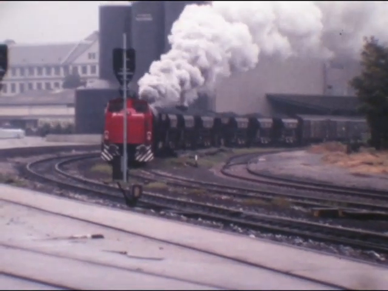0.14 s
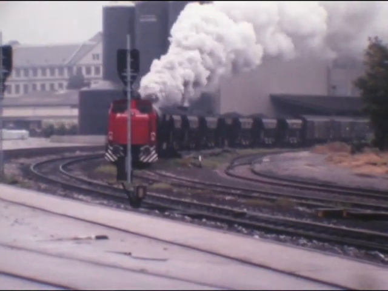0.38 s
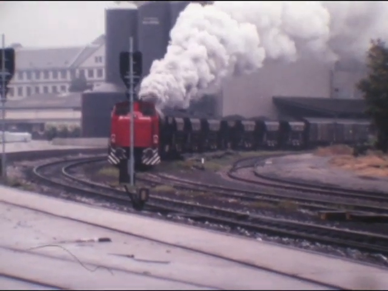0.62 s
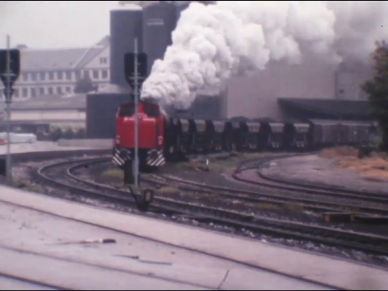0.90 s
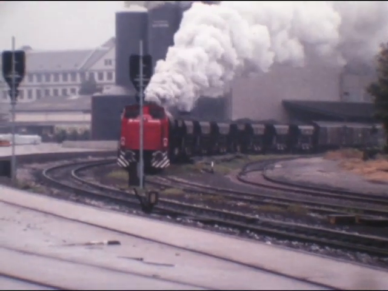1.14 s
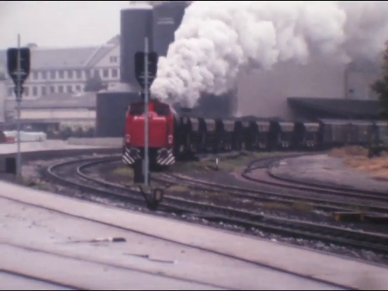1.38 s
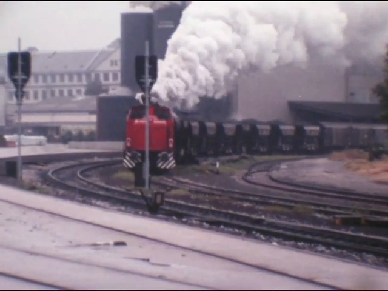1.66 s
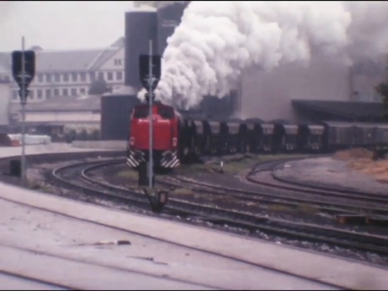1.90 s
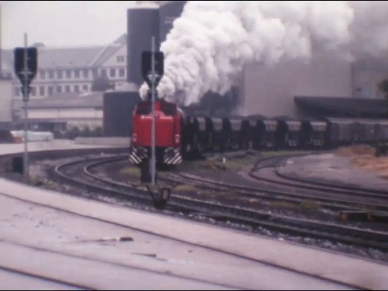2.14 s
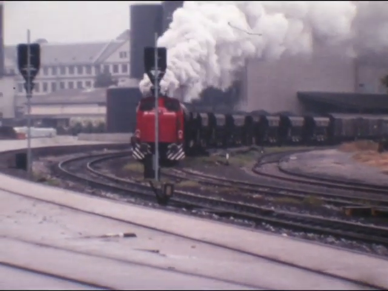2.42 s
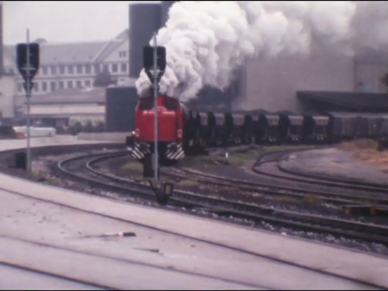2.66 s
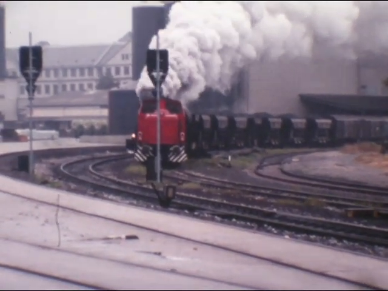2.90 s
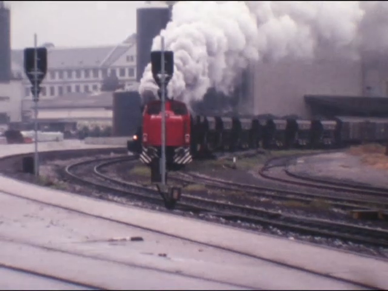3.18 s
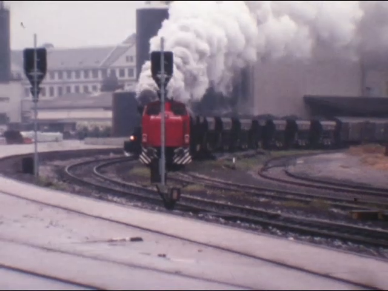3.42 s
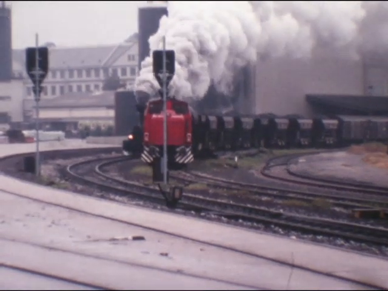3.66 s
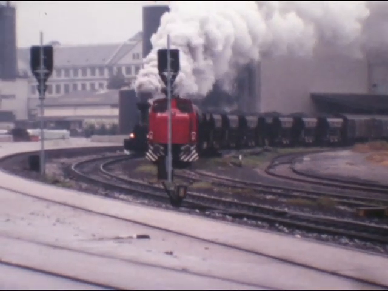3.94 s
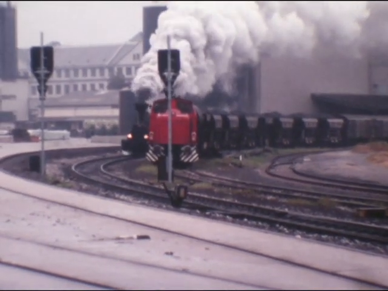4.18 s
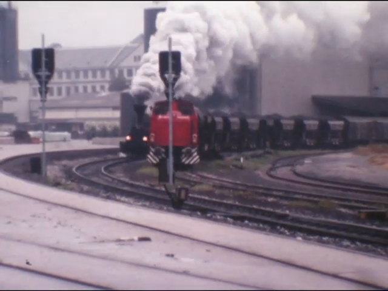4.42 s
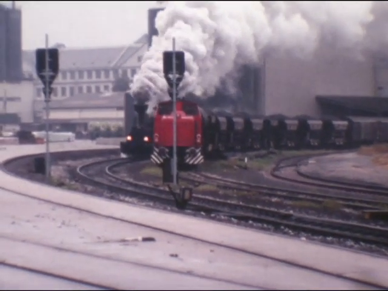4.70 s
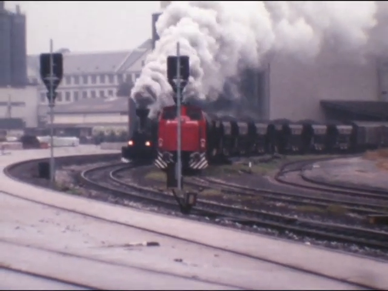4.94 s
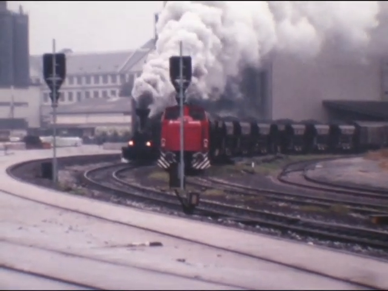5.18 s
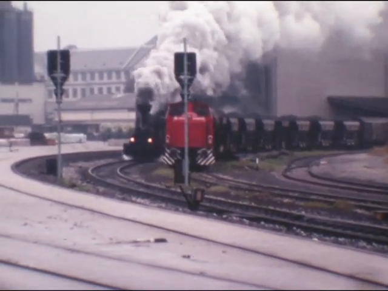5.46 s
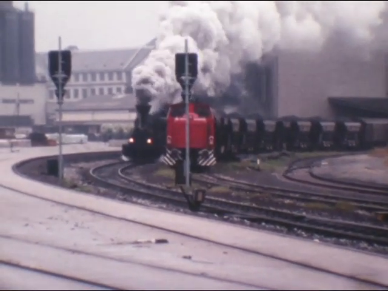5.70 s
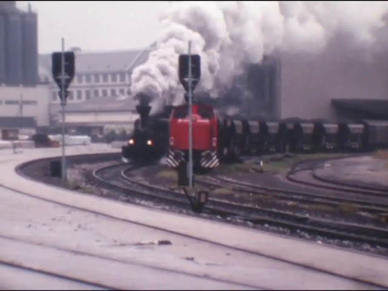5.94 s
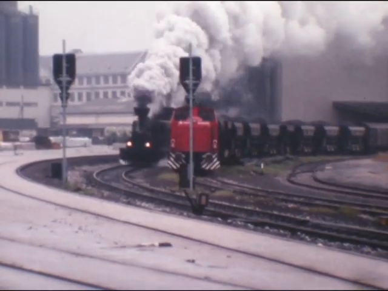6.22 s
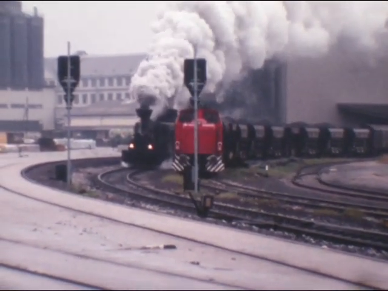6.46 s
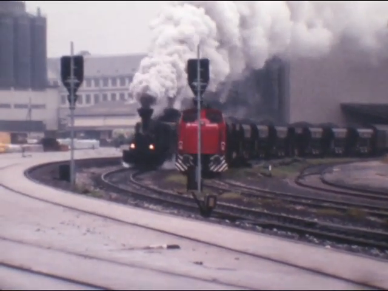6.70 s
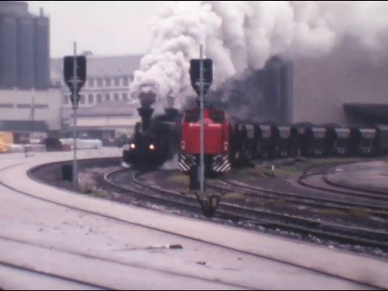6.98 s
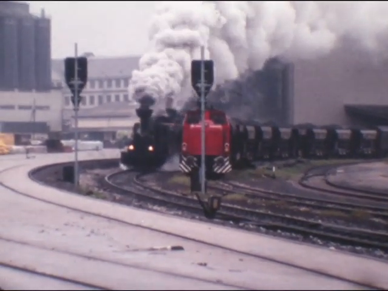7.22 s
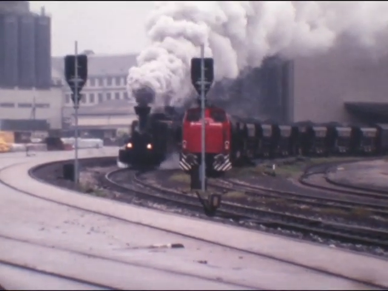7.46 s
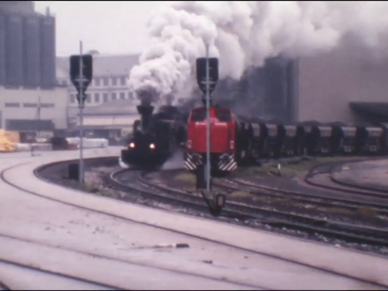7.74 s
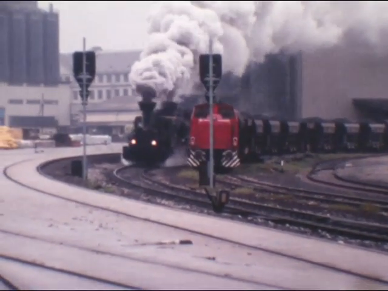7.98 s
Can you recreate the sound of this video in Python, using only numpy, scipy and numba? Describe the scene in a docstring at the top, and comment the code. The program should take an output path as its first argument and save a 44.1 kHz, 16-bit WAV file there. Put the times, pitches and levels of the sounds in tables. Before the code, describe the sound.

Heavy low engine pulsing surges and falters over gusty roar and wagon rumble, as faint steam puffs grow clearer on dull, worn tape.

```python
"""Railway yard on worn tape

A big diesel idles close by: its two banks fire in turn, each firing a pressure pulse that rings the stack modes.
The governor hunts, and about every two seconds a fuel cut starves one bank. A steam engine draws near: soft
chuffs of shaped noise over steady steam, a whistling leak, a drifting drone, a gusty roar and rumbling wagons.
Worn analogue tape squeezes and dulls the treble, loses head contact once and adds hiss and a tick."""
import sys
import numpy as np
from scipy import signal
from scipy.fft import rfft, irfft
from scipy.io import wavfile
from scipy.ndimage import uniform_filter1d
from numba import njit

SR = 44100
rng = np.random.default_rng(int(sys.argv[2]) if len(sys.argv) > 2 else 0)


def output_pcm(signal):
    """Save a mono or channel-first signal as 16-bit PCM at the path in sys.argv[1].

    Samples are clipped to [-1, 1] before scaling.
    """
    pcm = np.clip(np.atleast_2d(signal).T, -1, 1) * 32767
    wavfile.write(sys.argv[1], SR, np.round(pcm).astype(np.int16))


def convert_level_to_amplitude(level_db):
    """Map a level in decibels to its linear amplitude factor."""
    exponent = np.asarray(level_db, float) / 20
    return 10 ** exponent


N = 357210

# The steam engine nears: t/s, rumble level/dB, steady steam level/dB, leak level/dB
APPROACH = [(0, -17.5, -49, -70), (.8, -19, -50.5, -57), (1.2, -20, -51.5, -65), (2.3, -19, -54, -65),
            (3.1, -19, -53.5, -68.5), (3.3, -19.5, -49.5, -62.5), (3.7, -19, -51.5, -62),
            (4.3, -18.5, -48, -62), (4.9, -18.5, -45.5, -57), (5.5, -19, -47, -53),
            (6.2, -18.5, -47.5, -52.5), (7.2, -18, -46.5, -50), (8.1, -19, -43, -50.5)]


def unit(x):
    """Normalisation: divides a signal by its root mean square."""
    return x / np.sqrt(np.mean(x ** 2))


def curves(table):
    """Linear interpolation in time: one curve for each column after the first."""
    time_s, *columns = np.transpose(table)
    return [np.interp(np.arange(N) / SR, time_s, column) for column in columns]


def walk(rate):
    """Smoothed random process: levels held 1 / rate s, averaged twice over that time; spread near 1."""
    hold = int(SR / rate)
    held = np.repeat(rng.standard_normal(N // hold + 1), hold)
    return 1.3 * uniform_filter1d(uniform_filter1d(held, hold), hold)[:N]


def noise(gain):
    """Spectral shaping: white noise multiplied by a gain that depends on frequency."""
    hz = np.arange(N // 2 + 1) * SR / N + 1  # the 1 Hz offset keeps log(hz) finite
    return irfft(rfft(rng.standard_normal(N)) * gain(hz), N)


def peak(hz, centre_hz, width_hz):
    """Resonance curve: 1 at the centre, one half at half a width to either side."""
    return 1 / (1 + ((hz - centre_hz) / (width_hz / 2)) ** 2)


def colour(hz, spectrum):
    """Spectral density: gain joined by straight lines in dB over log frequency."""
    point_hz, level_db = np.transpose(spectrum)
    return convert_level_to_amplitude(np.interp(np.log(hz), np.log(point_hz), level_db, left=-120, right=-120))


def bands(gain, flicker_db, rate, throb, depth, octaves=range(9)):
    """Amplitude modulation by octave: each band flickers alone, the upper ones throb with the diesel."""
    total = 0
    for k in octaves:
        def band_gain(hz):
            return gain(hz) * np.cos(np.pi / 2 * np.clip(np.log2(hz / 32) - k, -1, 1))
        flicker = convert_level_to_amplitude(flicker_db * walk(rate))
        total = total + noise(band_gain) * flicker * (1 + depth * (k > 1) * throb)
    return unit(total)


@njit
def lowpass(x, edge_hz):
    """Two-pole state-variable low-pass whose edge may move at every sample."""
    y, band, low = np.empty(len(x)), 0., x[0]
    for i in range(len(x)):
        g = np.tan(np.pi * edge_hz[i] / SR)
        v = (band + g * (x[i] - low)) / (1 + g * (g + np.sqrt(2)))
        y[i] = low + g * v
        band, low = 2 * v - band, 2 * y[i] - low
    return y


def strike(at_s, size, shape):
    """Convolution: superposes one scaled copy of a shape at each moment."""
    lead = SR // 5  # room for moments before the start
    kicks = np.zeros(N + 2 * lead)
    np.add.at(kicks, (at_s * SR).astype(int) + lead, size)
    return signal.fftconvolve(kicks, shape)[lead:lead + N]


def hum():
    """Periodic radiation: steady sinusoids from machinery beside the diesel."""
    # f/Hz, rms level/dB
    tones = [(104.75, -28), (38.1, -37)]
    t = np.arange(N) / SR
    return sum(np.sqrt(2) * convert_level_to_amplitude(db) * np.sin(2 * np.pi * (hz * t + rng.random())) for hz, db in tones)


def body(hz):
    """Forced resonance: engine casings lift parts of a falling broadband spectrum."""
    # Broadband spectrum: f/Hz, relative level per Hz/dB
    spectrum = [(20, -27.5), (32, -8.5), (55, -12), (76, -7.5), (95, -14), (120, -4), (145, -9),
                (168, -16.5), (200, -14), (250, -22), (400, -23.5), (540, -30.5), (940, -35), (1580, -40),
                (1850, -46), (3000, -55), (3900, -69.5)]
    # Casing resonances: f/Hz, width/Hz, lift/dB
    casings = [(287, 24, 4), (331, 41, 3.5), (422, 24, 2.5), (671, 120, 5.5), (831, 40, 5), (1075, 95, 2),
               (1580, 92, 2.5)]
    return colour(hz, spectrum) * convert_level_to_amplitude(sum(db * peak(hz, f, w) for f, w, db in casings))


def wagon_rumble(throb):
    """Rolling noise: the three lowest octaves of the body spectrum, following the approach."""
    rumble = bands(body, flicker_db=0.75, rate=10.0, throb=throb, depth=0.03, octaves=range(3))
    return rumble * convert_level_to_amplitude(curves(APPROACH)[0])


def exhaust_roar(throb):
    """Broadband flow noise: the upper octaves of the body spectrum, their level wandering in gusts."""
    # t/s, level/dB
    roar_level = [(0, -22.5), (.8, -23.4), (1.2, -24.2), (2.3, -24.5), (3.1, -25), (3.8, -25), (4.2, -22.5),
                  (4.6, -24), (5, -23), (5.7, -24), (6.1, -23.5), (6.5, -24.5), (6.9, -23), (7.4, -23.5),
                  (8.1, -23.6)]
    gust_db, gusts_per_s = 0.68, 30
    roar = bands(body, flicker_db=0.5, rate=25.0, throb=throb, depth=0.047, octaves=range(3, 9))
    return roar * convert_level_to_amplitude(curves(roar_level)[0] + gust_db * walk(gusts_per_s))


def steam_leak():
    """Narrow-band jet noise: a leak whistles in two resonant bands."""
    # f/Hz, width/Hz, relative level/dB
    whistles = [(2890, 540, -0.5), (4880, 320, -8)]
    leak = unit(noise(lambda hz: sum(convert_level_to_amplitude(db) * peak(hz, f, w) for f, w, db in whistles)))
    return leak * convert_level_to_amplitude(curves(APPROACH)[2] + 1.3 * walk(12))


def drifting_drone():
    """Frequency modulation: the phase is the running sum of a drifting, wobbling frequency."""
    # t/s, f/Hz, rms level/dB
    drift = [(0, 330, -48), (3.3, 325, -42), (3.9, 328, -38), (4.2, 334, -30.5), (4.45, 340, -35),
             (4.9, 355, -39.5), (5.5, 352, -39.5), (5.9, 348, -34), (6.5, 343, -32.5), (6.9, 338, -38),
             (7.4, 338, -35.5), (8.1, 336, -40.5)]
    wobble_hz, wobbles_per_s = 4, 12
    waver_db, wavers_per_s = 1.5, 7.4
    drone_hz, drone_db = curves(drift)
    phase = 2 * np.pi * np.cumsum(drone_hz + wobble_hz * walk(wobbles_per_s)) / SR
    return np.sqrt(2) * np.sin(phase) * convert_level_to_amplitude(drone_db + waver_db * walk(wavers_per_s))


def steady_steam(throb):
    """Turbulent jet noise: a continuous hiss that grows and ebbs as the steam engine nears."""
    # f/Hz, relative level per Hz/dB
    spectrum = [(880, -33), (1500, -4.5), (1610, -12), (2070, -4.5), (2850, -3.5), (3990, -10), (4940, -14),
                (7070, -26.5), (7790, -35), (10100, -36.5), (16000, -55)]
    steam = bands(lambda hz: colour(hz, spectrum), flicker_db=.6, rate=20, throb=throb, depth=.03)
    return convert_level_to_amplitude(curves(APPROACH)[1]) * steam


def chuffs(throb):
    """Pulsed jet noise: puffs up the blast pipe excite the chimney resonance; distant air absorbs treble."""
    # Puffs: t/s, level/dB, spread/ms, chimney ring level above the puff/dB
    puffs = [(0.181, -56, 69, -2), (.82, -52, 66, 2), (1.5, -62.5, 60, -3.5), (1.9, -62.5, 55, -5),
             (2.55, -55, 45, -8), (2.771, -58, 48, -2.5), (3.225, -54, 30, -10), (3.551, -64, 34, -7),
             (3.87, -50, 75, -7), (4.259, -53, 55, -7), (4.53, -45.5, 80, 0), (4.85, -57, 47, -6),
             (5.152, -47, 76, 3), (5.54, -53.5, 38, -6), (5.81, -48, 83, 0), (6.152, -53, 60, -5),
             (6.479, -50, 80, -3), (6.801, -53, 50, -6), (7.1, -48, 86, -4), (7.42, -52.5, 42, -6),
             (7.72, -49, 74, 1), (8.07, -55, 38, -5)]
    # Puff spectrum: f/Hz, relative level per Hz/dB
    spectrum = [(1200, -36), (2000, -9), (3400, -7), (5000, -6), (6500, -13.5), (7800, -22), (9500, -25),
                (12000, -30), (16000, -42)]
    # Chimney resonance: f/Hz, width/Hz
    chimney = (3470, 600)
    # Air absorption, strongest while the engine is far: t/s, low-pass edge f/Hz
    air = [(0, 3700), (3, 4800), (3.8, 14050), (8.1, 13870)]
    ring_spread = 0.85  # the ring fills only the heart of a puff
    t = np.arange(N) / SR

    def bump(at_s, spread_ms):
        return np.exp(-.5 * ((t - at_s) * 1000 / spread_ms) ** 2)

    swell = sum(convert_level_to_amplitude(db) * bump(s, spread) for s, db, spread, _ in puffs)
    heart = sum(convert_level_to_amplitude(db + ring_db) * bump(s, ring_spread * spread) for s, db, spread, ring_db in puffs)
    jet = bands(lambda hz: colour(hz, spectrum), flicker_db=2.1, rate=16, throb=throb, depth=0)
    ring = unit(noise(lambda hz: peak(hz, *chimney)))
    return lowpass(swell * jet + heart * ring, curves(air)[0])


def governor(due, bank):
    """Limit cycle: firing lateness and force repeat from surge to surge, and fuel cuts starve one bank."""
    # One swing: share of the swing, lateness/ms, strength (0-1) of thump, low bark, high bark
    hunt = [(0, 3.5, 0.9, 0.96, 0.49), (.08, 3.8, .61, .76, .74), (.16, 1.5, .45, .6, 0.93),
            (.25, -2, .72, .64, .86), (.35, -3.0, .9, .5, .54), (.45, -2.5, .95, .85, .5),
            (.53, -2, 1.03, 0.96, .58), (.62, 0, 1, .86, .66), (.7, 0.33, .7, .62, .66),
            (.78, 1.5, .54, .36, 0.31), (.87, 2.8, .75, .42, .45), (.94, 3.5, .9, .86, .34)]
    # Starts of the swings: t/s, bark level/dB
    surges = [(-1.26, -1.5), (.5, 0.0), (2.3, 0.0), (4, 0.6), (6.0, 0.5), (8, 0.0), (9, 0.5)]
    # Fuel cuts: t/s, length/s, starved bank (0 or 1)
    cuts = [(0.781, .92, 0), (2.677, 0.97, 1), (4.553, .8, 1), (6.269, .93, 0)]
    # Share of thump, low bark and high bark left in a cut; below 0 the bank sucks gas back
    starved = [-0.19, -.02, .02]
    # Level/dB of thump, low bark and high bark at strength 1
    voice_db = [-4, -4.5, -6]
    cut_edge_s = .04
    suck_depth, suck_before_s, suck_spread_s = 0.42, .15, 0.13  # deeper suck just before the fuel returns

    surge_s, bark_db = np.transpose(surges)
    swing = np.interp(due, surge_s, np.arange(len(surges)))
    bark = convert_level_to_amplitude(np.interp(due, surge_s, bark_db))
    share, *columns = np.transpose(hunt)
    late_ms, *strength = [np.interp(swing, share, column, period=1) for column in columns]

    def onset(s):
        return 1 / (1 + np.exp(-s / cut_edge_s))

    cut, suck = 0, 0
    for start, length, starved_bank in cuts:
        hit = bank == round(starved_bank)
        end = start + length
        cut = cut + hit * onset(due - start) * onset(end - due)
        suck = suck + hit * np.exp(-.5 * ((end - suck_before_s - due) / suck_spread_s) ** 2)
    thump, low, high = [convert_level_to_amplitude(db) * c * (1 - cut * (1 - left))
                        for c, left, db in zip(strength, starved, voice_db)]
    return late_ms, [thump - suck_depth * convert_level_to_amplitude(voice_db[0]) * suck, bark * low, bark * high]


def diesel():
    """Impulse excitation: firings swell the silencer (thump) and ring the stack (bark); also returns the gas throb."""
    # Stack modes: f/Hz, level/dB, t60/s, delay of opening/ms, bark (1 low, 2 high)
    modes = [(105.87, -5, .35, 5.8, 1), (121.32, 1.26, .38, 8.06, 1), (161.97, -3, .5, 3.93, 2),
             (171.8, -3.0, .5, 4.05, 2)]
    # Exhaust port of low and high bark, which opens, then stifles the ring: rise/ms, stifled after/ms
    ports = [(12.2, 150), (7.7, 68)]
    # Silencer thump: f/Hz, level/dB
    thump_tones = [(56, -2.5), (40, -11)]
    firings_per_s, first_s = 17.994, -.0756
    thump_peak_ms, thump_spread_ms = 36.6, 13.4

    slot = np.arange(147)
    due = first_s + slot / firings_per_s
    late_ms, force = governor(due, slot % 2)  # the banks alternate
    chance = rng.standard_normal((2 + len(modes), len(slot)))
    at = due + (late_ms + .3 * chance[0]) / 1000
    t = np.arange(SR // 4) / SR

    u = t - thump_peak_ms / 1000
    swell = np.exp(-.5 * (u * 1000 / thump_spread_ms) ** 2)
    thump = -swell * sum(convert_level_to_amplitude(db) * np.cos(2 * np.pi * hz * u) for hz, db in thump_tones)
    out = strike(at, force[0] + .03 * chance[1], thump)

    # every firing shares its force a little differently among the modes
    for (hz, db, t60, opens_ms, group), own in zip(modes, chance[2:]):
        rise_ms, shut_ms = ports[group - 1]
        port = (1 - np.exp(-(t * 1000 / rise_ms) ** 3)) * np.exp(-(t * 1000 / shut_ms) ** 2)
        ring = -np.sin(2 * np.pi * hz * t) * port * 1000 ** (-t / t60)
        out = out + strike(at + opens_ms / 1000, convert_level_to_amplitude(db) * (force[group] + .035 * own), ring)

    soft_ends = (1 - np.exp(-(t / .003) ** 3)) * np.cos(np.pi / 2 * t / t[-1]) ** 2
    throb = strike(at + 0.019, np.abs(force[1]) + np.abs(force[2]), soft_ends * np.exp(-t / 0.041))
    return out, unit(throb - throb.mean())


def scene():
    """Interference: the sources add at one microphone, and the ground bounce cancels part of a band."""
    # f/Hz, width/Hz, share cancelled at the centre
    ground_dip = (139, 16, .65)
    engine, throb = diesel()
    train = wagon_rumble(throb) + exhaust_roar(throb) + steam_leak() + drifting_drone()
    direct = hum() + train + steady_steam(throb) + chuffs(throb) + engine
    centre_hz, width_hz, share = ground_dip
    hz = np.arange(N // 2 + 1) * SR / N
    return irfft(rfft(direct) * (1 - share * peak(hz, centre_hz, width_hz)), N)[None]


def tape_squeeze(x):
    """Intermodulation: steep bass swings, falling ones most, reduce the treble gain."""
    bass = lowpass(x, np.full(N, 400.))
    fall = -np.gradient(lowpass(x, np.full(N, 130.))) * SR  # slope per second
    swing = np.maximum(fall / 265, -fall / 450)
    return bass + (x - bass) / (1 + swing ** 4)


def tape_dropout(x):
    """Spacing loss: the head loses contact once, and the low-pass edge dips briefly."""
    # t/s, spread/ms, lowest edge f/Hz, level of the unfiltered share/dB
    dropout = (3.168, 17, 779, -22)
    at_s, spread_ms, left_hz, leak_db = dropout
    t = np.arange(N) / SR
    lift = np.exp(-.5 * np.abs((t - at_s) * 1000 / spread_ms) ** 2.6)
    edge_hz = 18000 * (left_hz / 18000) ** lift
    dulled = lowpass(lowpass(x, edge_hz), edge_hz)
    return dulled * (1 - convert_level_to_amplitude(leak_db)) + convert_level_to_amplitude(leak_db) * x


def band_limit(x):
    """A steep low-pass at the top of the band."""
    return signal.sosfilt(signal.butter(12, 15150, fs=SR, output="sos"), x)


def record(dry):
    """Magnetic recording: squeeze, dropout, saturation, one tick, a dull top and faint hiss."""
    # t/s, peak level relative to 0.5/dB
    tick = (6.0575, -15)
    top_hz = 7790
    t = np.arange(N) / SR
    x = tape_dropout(tape_squeeze(convert_level_to_amplitude(-.9) * dry[0]))  # recording level -0.9 dB
    x = np.tanh(0.82 * x) / 0.79 + convert_level_to_amplitude(-74.5) * rng.standard_normal(N)  # saturation and tape hiss
    tick_s, tick_db = tick
    x = x + convert_level_to_amplitude(tick_db) * np.exp(-.5 * ((t - tick_s) / 35e-6) ** 2) / 2
    top = signal.ellip(5, .5, 22, top_hz, fs=SR, output="sos")
    x = signal.sosfilt(top, x, zi=signal.sosfilt_zi(top) * x[0])[0]
    # no bass below the thump
    x = signal.sosfiltfilt(signal.butter(3, 27, "high", fs=SR, output="sos"), x)
    x = x * np.minimum(t / .002, 1) + convert_level_to_amplitude(-96) * rng.standard_normal(N)  # soft start; amplifier hiss
    return band_limit(x[None])


dry = scene()
out = record(dry)
output_pcm(out)
```